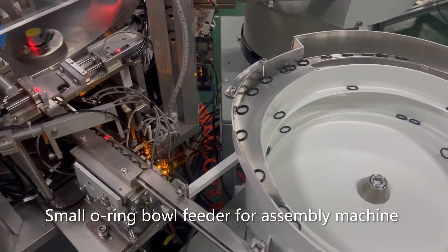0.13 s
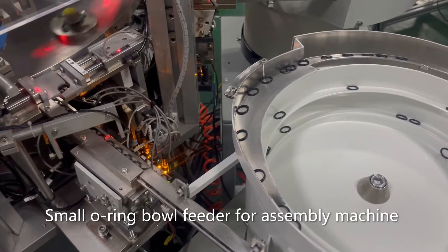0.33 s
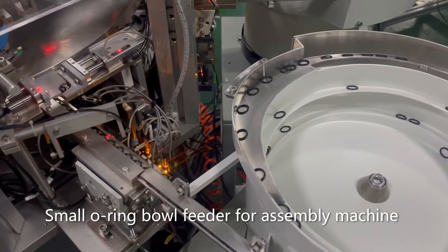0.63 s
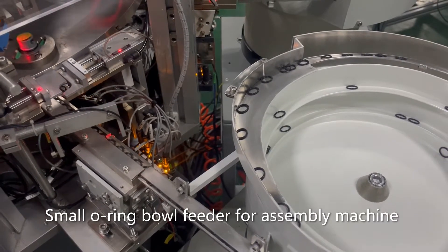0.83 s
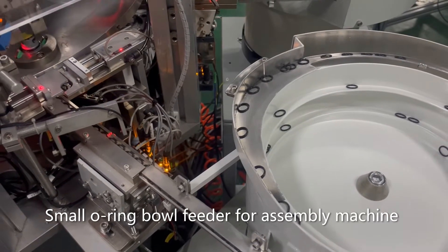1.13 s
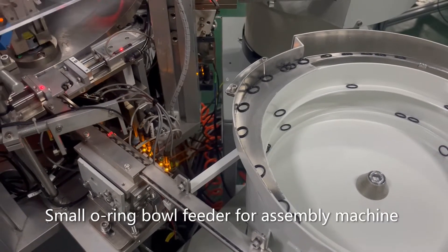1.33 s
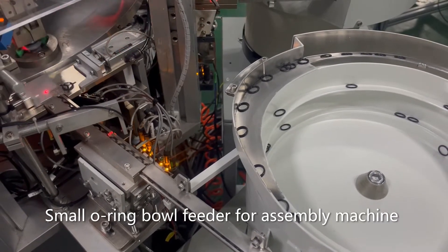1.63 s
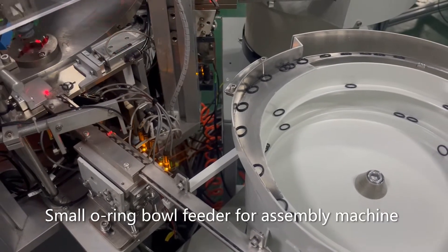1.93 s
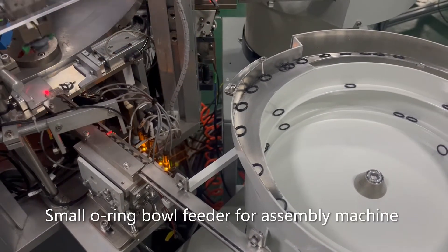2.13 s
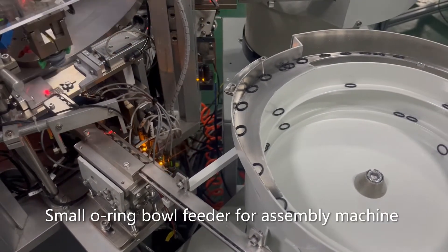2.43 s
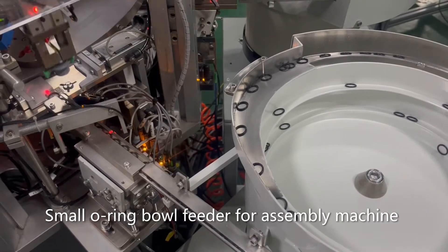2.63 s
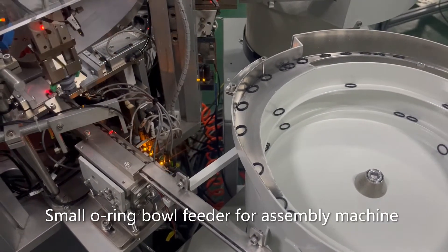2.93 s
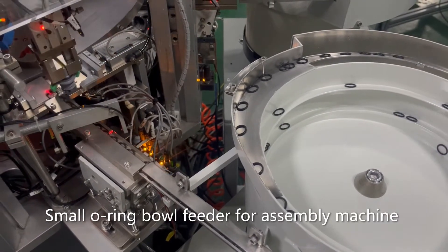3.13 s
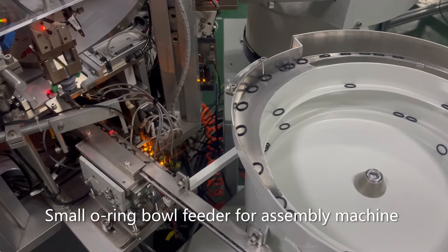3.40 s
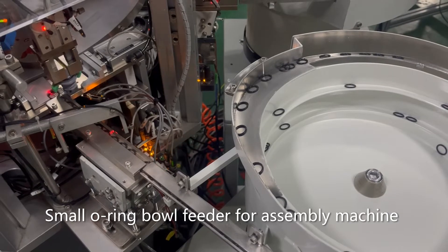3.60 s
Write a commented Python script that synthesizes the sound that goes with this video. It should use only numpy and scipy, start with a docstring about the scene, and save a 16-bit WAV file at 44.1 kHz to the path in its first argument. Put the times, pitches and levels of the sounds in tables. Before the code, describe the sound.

A sharp, bright compressed air hiss bursts from an assembly machine after humming, rattling and a clack

```python
"""Compressed air hisses and whistles for two seconds from an automatic assembly machine: shaped noise behind a fast valve.
Before it a bowl feeder hums and rings out (sine and octave), a feed rail rattles (repeated taps) and a slide clacks.
Cylinders knock and one heavy stop thuds during the hiss (damped modes and noise bursts). As the air shuts off, another
vibrator, faster than the rail, shakes its parts (hum lines and pulsing noise). Reflections, a hall rumble and an air
leak surround it all.
"""
import sys
import numpy as np
from scipy import signal
from scipy.fft import rfft, irfft, next_fast_len
from scipy.io import wavfile
from scipy.ndimage import map_coordinates

SR = 44100
rng = np.random.default_rng(int(sys.argv[2]) if len(sys.argv) > 2 else 0)


def int16_out(signal):
    """Quantize to a 16-bit WAV file."""
    q = np.round(np.clip(np.atleast_2d(signal).T, -1, 1) * 32767)
    wavfile.write(sys.argv[1], SR, q.astype(np.int16))


N = 165816
AIR_ON_S = 1.279  # the rail stops here too


def amp(db):
    """Decibels to gain."""
    return 10 ** (np.asarray(db) / 20)


def unit(x):
    """Scale to rms 1."""
    return x / np.sqrt(np.mean(x ** 2) + 1e-20)


def clock():
    """Time of each sample in seconds."""
    return np.arange(N) / SR


def along(points, hz):
    """Interpolate (Hz, value) points on a log frequency axis."""
    f, v = np.transpose(points)
    return np.interp(np.log(hz + 1), np.log(np.abs(f) + 1), v)


def curves(rows):
    """One value per sample for each column after the time."""
    s, *cols = np.transpose(rows)
    return [np.interp(clock(), s, c) for c in cols]


def wobble(knots_per_s):
    """Smooth random curve that repeats after about 400 knots."""
    return map_coordinates(rng.standard_normal(400), [clock() * knots_per_s], mode="wrap")


def filtered(x, response):
    """Multiply the spectrum of x by a response of frequency."""
    m = next_fast_len(x.shape[-1] + 8192)  # padded against wrap-around
    spectrum = rfft(x, m) * response(np.fft.rfftfreq(m, 1 / SR))
    return irfft(spectrum, m)[..., :x.shape[-1]]


def noise(colour, size=N):
    """Coloured noise of rms 1."""
    return unit(filtered(rng.standard_normal(size), lambda hz: amp(along(colour, hz))))


def pan(db):
    """Left and right gains for a left-minus-right level in dB."""
    return amp([[db / 2], [-db / 2]])


def at_ports(x):
    """The phase that the two microphones give to sound from the machine."""
    # Each row: frequency in Hz, lead of the left microphone in radians.
    port_phase = [(200, -0.08), (1400, 3), (2200, 0.07), (4900, 1.12), (8000, -3), (12000, -6.5),
                  (15500, -9.5)]
    return filtered(x, lambda hz: np.exp(np.array([[.5j], [-.5j]]) * along(port_phase, hz)))


def off_metal(x):
    """Dense reflections off nearby metal: decaying noise, different at each microphone."""
    t60_s = 0.07
    t = np.arange(SR // 8) / SR
    walls = rng.standard_normal((2, len(t))) * amp(-60 * t / t60_s)
    walls /= np.linalg.norm(walls, axis=1, keepdims=True)
    return signal.fftconvolve(np.atleast_2d(x), walls, axes=1)[:, :N]


def among_metal(x, scatter_db, pan_db):
    """Direct sound plus its reflections, scaled to hold the total power."""
    both = at_ports(x) + amp(scatter_db) * off_metal(x)
    return pan(pan_db) * both / np.hypot(1, amp(scatter_db))


def spread_out(draw):
    """Stereo hiss from three draws of a noise: one shared by both microphones, one for each alone."""
    # Each row: frequency in Hz, left-right likeness as a power share.
    likeness = [(1000, 0.34), (6300, 0.34), (8000, 1), (14000, 0.84)]
    alike = lambda hz: np.clip(along(likeness, hz), 0, 1)
    shared = at_ports(filtered(draw(), lambda hz: np.sqrt(alike(hz))))
    separate = np.array([draw(), draw()])
    return shared + filtered(separate, lambda hz: np.sqrt(1 - alike(hz)))


def struck(s, t60, attack=0.00056):
    """Envelope of a blow at time s: exponential attack and decay, in seconds."""
    age = np.maximum(clock() - s, 0)
    return (1 - np.exp(-age / attack)) * amp(-60 * age / t60)


def ring(s, modes, attack):
    """Damped (Hz, dB, t60 s) modes set off at time s."""
    t = clock() - s
    return sum(amp(db) * struck(s, t60, attack) * np.sin(2 * np.pi * hz * t) for hz, db, t60 in modes)


def tones(rows, unsteady_db, drift_rad):
    """Hum lines, each wandering slightly in level and phase."""
    total = 0
    for hz, db in rows:
        level = np.sqrt(2) * amp(db + unsteady_db * wobble(11.0))
        total = total + level * np.cos(2 * np.pi * hz * clock() + drift_rad * wobble(13.0))
    return total


def whistle():
    """The gap that the air blows across whistles: narrow noise at a pitch that sinks, then steps down at 2.8 s."""
    # Each row: time in seconds, pitch in Hz.
    pitch = [(1.28, 5300), (1.6, 5130), (1.88, 5140), (2.02, 5020), (2.35, 4950), (2.8, 4920), (2.85, 4610),
             (3.33, 4620)]
    # Each row: time in seconds, level in dB.
    level = [(1.28, -37), (1.35, -26), (1.83, -22.5), (2.0, -31), (2.78, -31), (2.86, -35.5), (3.0, -30.5),
             (3.33, -29.5)]
    # Each row: distance from the pitch in Hz, relative level in dB.
    band = [(70, -1.5), (170, -10), (480, -13), (1200, -42)]
    carrier = np.sqrt(2) * np.cos(2 * np.pi * np.cumsum(curves(pitch)[0]) / SR)
    return amp(curves(level)[0]) * spread_out(lambda: carrier * noise(band))


def air():
    """The valve snaps open on two jets; the hard one stops early, the long one sags until the valve shuts."""
    off_s, attack_s, release_db_per_s = 3.325, 0.0062, 900
    long_db, long_sag_db_per_s = -18.5, 1.8
    hard_db, hard_off_s, hard_release_db_per_s = -17.5, 1.778, 75
    scatter_db = -6  # reflections inside the machine
    # Colours of the long jet, the hard jet and the low hiss. Each row: frequency in Hz, relative level in dB.
    long_colour = [(1000, -20), (2560, -16.5), (2800, -6), (3500, -5), (5450, -3), (5900, -11), (7600, -10),
                   (8650, -5.5), (10800, -4), (13100, 0.5), (15700, -7)]
    hard_colour = [(1000, -19), (2400, -13), (2850, -4.5), (4200, -6), (5550, 2.5), (5900, -6.5),
                   (8800, -13.5), (9900, -3.5), (14700, -6.5), (15400, -9)]
    low_colour = [(300, -24), (800, -10.5), (1600, -2), (2300, 0), (3500, -2.5), (7000, -40)]
    # Low hiss over time. Each row: time in seconds, level in dB.
    low_level = [(1.28, -32), (1.75, -36.5), (2.0, -45), (2.25, -51), (2.75, -43.5), (2.92, -31.5),
                 (3.15, -31.5), (3.33, -33)]
    # Each row: frequency in Hz, left minus right in dB.
    jet_pan = [(5200, 3), (7500, -0.5)]

    t = clock()
    opening = np.clip((t - AIR_ON_S) / attack_s, 0, 1)
    valve = opening * amp(-release_db_per_s * np.maximum(t - off_s, 0))
    long_push = amp(long_db - long_sag_db_per_s * (t - AIR_ON_S) + 0.8 * wobble(13))
    long = long_push * spread_out(lambda: noise(long_colour))
    hard_fall_db = hard_release_db_per_s * np.maximum(t - hard_off_s, 0)
    hard_push = amp(hard_db - hard_fall_db + 0.42 * wobble(9.9))
    hard = hard_push * spread_out(lambda: noise(hard_colour))
    low = amp(curves(low_level)[0] + 0.75 * wobble(14)) * spread_out(lambda: noise(low_colour))
    sides = np.array([[.5], [-.5]])
    hiss = filtered(long + hard + whistle(), lambda hz: amp(sides * along(jet_pan, hz)))
    direct = valve * (hiss + low)
    return direct + amp(scatter_db) * off_metal(direct)


def bowl():
    """The driven bowl hums with its octave, then rings out freely at its own pitch."""
    drive_hz, free_hz, off_s, fall_db_per_s = 95.5, 101.5, 0.436, 50
    level_db, octave_db, pan_db = -19.5, -18, 8
    free_s = np.maximum(clock() - off_s, 0)
    phase = 2 * np.pi * np.cumsum(np.where(free_s > 0, free_hz, drive_hz)) / SR
    swing = amp(level_db - fall_db_per_s * free_s + 0.31 * wobble(15))
    hum = np.sqrt(2) * (np.cos(phase) + amp(octave_db) * np.cos(2 * phase))
    return swing * pan(pan_db) * hum


def rail():
    """Each stroke gives the same tap and short ring, and a spray of loose chatter, over hum lines."""
    first_s, stroke_hz, tap_db, loose_db = .012, 41.36, -34, -35
    # Each row: time in seconds, gain in dB.
    rail_level = [(0, -2.5), (.11, 0), (.7, -2.5), (1.02, -3), (1.08, 0), (1.125, -1), (1.15, -8),
                  (1.27, -13)]
    # Each row: frequency in Hz, relative level in dB.
    body_colour = [(100, -36), (500, -13.5), (1000, -11.5), (1500, -4.5), (2300, -14), (2520, -17),
                   (2900, -15), (4600, -22), (5500, -16.5), (15000, -29.5)]
    # Each row: frequency in Hz, level in dB, time to peak in seconds.
    ring_modes = [(760, -37.5, .005), (1440, -42, 0.0032), (1813, -27, 0.0057), (2304, -35.5, .0032),
                  (5450, -34.5, 0.0019)]
    # Each row: frequency in Hz, level in dB.
    hum_lines = [(124, -43), (248, -42), (289.5, -46.5), (413.7, -43.5), (1778.5, -46), (1861, -47.5)]

    gain = amp(curves(rail_level)[0]) * (clock() < AIR_ON_S)
    times = np.arange(first_s, AIR_ON_S, 1 / stroke_hz)
    taps = np.bincount((times * SR).astype(int), minlength=N) * gain * amp(1.3 * wobble(40.26))
    play = lambda stroke: signal.fftconvolve(taps, stroke)[:N]

    t = np.arange(SR // 16) / SR
    swell = (1 - np.exp(-t / 0.0028)) * amp(-60 * t / 0.091)
    swell /= np.sqrt(np.sum(swell ** 2) * stroke_hz / SR)  # mean power 1 over the strokes
    same_tap = amp(tap_db) * play(swell * noise(body_colour, size=len(t)))
    chatter = amp(loose_db) * play(swell) * noise(body_colour)
    stroke_ring = 0
    for hz, db, peak_s in ring_modes:
        rise_fall = (t / peak_s * np.exp(1 - t / peak_s)) ** 2
        stroke_ring = stroke_ring + amp(db) * rise_fall * np.sin(2 * np.pi * hz * t)
    hum = gain * tones(hum_lines, unsteady_db=0.5, drift_rad=0.1)
    body = among_metal(same_tap + chatter, scatter_db=1.5, pan_db=3)
    return body + pan(db=1.5) * (play(stroke_ring) + hum)


def clack():
    """The slide hits its stop and rebounds once: a short crack and the ring of the metal."""
    crack_db, crack_t60_s = 4.5, 0.058
    # Each row: time in seconds, strength in dB.
    hits = [(.637, -18), (0.6503, -28)]
    # Each row: frequency in Hz, relative level in dB, t60 in seconds.
    metal_modes = [(433, -8, 0.14), (890, -1, 0.07), (932, 1.5, 0.068), (1765, -1, 0.074), (4750, 3, 0.016),
                   (5450, 2, 0.026)]
    # Each row: frequency in Hz, relative level in dB.
    crack_colour = [(250, -24), (480, -0.5), (700, -24), (950, -4.5), (1400, -10), (1800, -6.5),
                    (2600, -15.5), (5500, -20.5), (9000, -29.5)]
    metal = sum(amp(db) * ring(s, metal_modes, attack=0.0011) for s, db in hits)
    bursts = sum(amp(db) * struck(s, crack_t60_s) for s, db in hits)
    crack = amp(crack_db) * noise(crack_colour) * bursts
    return among_metal(crack, scatter_db=-3.5, pan_db=0.5) + among_metal(metal, scatter_db=-8, pan_db=6.5)


def thud():
    """The gripper head meets its heavy stop: a noise crack, then damped modes."""
    hit_s, modes_db, crack_db = 2.2772, -5.5, -13.5
    # Each row: frequency in Hz, relative level in dB, t60 in seconds.
    stop_modes = [(262.5, -12, 0.58), (291, 4.5, 0.092), (335, -5, 0.17), (407.6, -6, 0.17),
                  (477, -17, 0.37), (765, -23, .2)]
    # (Hz, relative dB)
    crack_colour = [(120, -29), (300, 5.0), (700, -1.0), (1000, -7), (1800, -9.5), (3000, -35), (9000, -24)]
    crack = amp(crack_db) * struck(hit_s - .002, t60=0.088) * noise(crack_colour)
    body = amp(modes_db) * ring(hit_s, stop_modes, attack=0.0031)
    return among_metal(crack, scatter_db=-4, pan_db=4.5) + pan(db=2.0) * body


def knocks():
    """Cylinders knock on the frame: each a noise tap and one ringing panel mode."""
    panel_t60_s, tap_t60_s = 0.17, 0.13
    # Each row: time in seconds, panel ring in dB, its pitch in Hz, tap in dB.
    blow_rows = [(1.281, -25.5, 278, -19), (1.308, -17, 171.6, -27), (1.358, -19, 196, -20),
                 (1.392, -23, 176, -28.5), (1.428, -25, 240, -23.5), (1.829, -27, 407, -24),
                 (1.901, -20, 170.3, -21.5), (1.928, -18.5, 198, -21.5), (2.378, -21, 266.7, -32.5),
                 (2.416, -23, 262, -23.5), (2.497, -23.5, 271, -24.5), (2.872, -15.5, 336.2, -24.5),
                 (2.96, -25, 348, -22.5), (3.255, -21, 166.7, -21.5)]
    # Each row: frequency in Hz, relative level in dB.
    frame_colour = [(40, -28), (110, -3.5), (170, -1), (330, -2), (520, -9), (900, -7.5), (1300, -19),
                    (4000, -33)]
    taps = noise(frame_colour) * sum(amp(db) * struck(s, tap_t60_s, attack=0.002) for s, _, _, db in blow_rows)
    panels = sum(ring(s, [(hz, db, panel_t60_s)], attack=0.0033) for s, db, hz, _ in blow_rows)
    return among_metal(taps, scatter_db=-4, pan_db=4.5) + pan(db=2.0) * panels


def bump():
    """A soft low bump: one short damped mode, equal on both sides."""
    return ring(1.068, [(84.4, -11.5, 0.063)], attack=0.0016)


def shaker():
    """Another vibrator, faster than the rail, swells; the many parts on it chatter with each stroke."""
    stroke_hz, on_s, rise_s, parts_db = 49.2, 3.256, 0.23, -26.5
    # Each row: frequency in Hz, level in dB.
    hum_lines = [(49.2, -54), (98.4, -37.5), (147.6, -41.5), (196.8, -40.5), (246, -42), (803, -40.5)]
    # Each row: frequency in Hz, relative level in dB.
    parts_colour = [(300, -36), (550, -10), (800, -4.5), (1300, -4.5), (1850, -4), (4400, -10),
                    (7000, -23.5), (14000, -52)]
    swing = np.clip((clock() - on_s) / rise_s, 0, 1)
    separate = np.array([noise(parts_colour), noise(parts_colour)])
    chatter = unit(separate + 0.51 * noise(parts_colour))
    pulse_db = 0.61 * np.cos(2 * np.pi * stroke_hz * clock())
    parts = chatter * amp(parts_db + pulse_db + 0.54 * wobble(300))
    return swing * pan(db=2.5) * (parts + tones(hum_lines, unsteady_db=0.5, drift_rad=0.19))


def reverb(x):
    """The hall's tail: stereo noise whose decay is shorter in the treble."""
    # Each row: frequency in Hz, t60 in seconds.
    hall_t60 = [(150, 0.55), (1500, 0.41), (12000, 0.056)]
    hz, t, z = signal.stft(rng.standard_normal((2, SR // 2)), SR, nperseg=256)
    decay = amp(-60 * t / along(hall_t60, hz)[:, None])
    tail = signal.istft(z * decay, SR, nperseg=256)[1]
    return signal.fftconvolve(x, tail / np.linalg.norm(tail[0]), axes=1)[:, :N]


def hall():
    """Distant machines: low coloured noise of wandering level."""
    # Each row: frequency in Hz, relative level in dB.
    rumble_colour = [(25, -46), (55, -5.5), (100, -3), (150, -9), (250, -6.5), (480, -17.5), (1100, -25),
                     (2000, -22), (8000, -47)]
    rumble = among_metal(noise(rumble_colour), scatter_db=-4, pan_db=3.5)
    return amp(-34 + 2.2 * wobble(5.994)) * rumble


def leak():
    """A leaking air line: steady-coloured stereo hiss of varying level."""
    # Each row: time in seconds, level in dB.
    leak_level = [(0, -30.5), (1.02, -35.5), (1.13, -28.5), (1.2, -34), (1.3, -39.5), (3.3, -36.5),
                  (3.76, -37)]
    # Each row: frequency in Hz, relative level in dB.
    leak_colour = [(1500, -7), (4600, -0.5), (5800, -2), (15000, -1.5)]
    return amp(curves(leak_level)[0]) * spread_out(lambda: noise(leak_colour))


def scene():
    """All parts of the machine in the hall."""
    jets = air()
    blows = clack() + thud() + knocks() + bump()
    tail = reverb(amp(-10) * blows + amp(-11.5) * jets)
    return jets + bowl() + rail() + blows + shaker() + tail + hall() + leak()


def record(dry):
    """Cut everything from the band limit up."""
    top_hz = 15750
    return filtered(dry, lambda hz: hz < top_hz)


dry = scene()
out = record(dry)
int16_out(out)
```